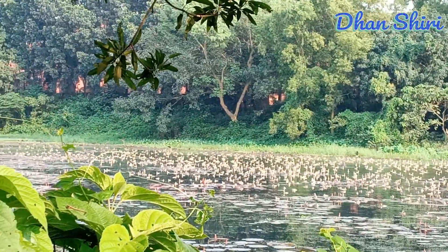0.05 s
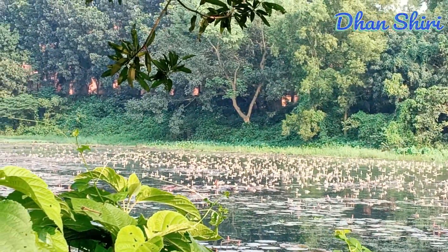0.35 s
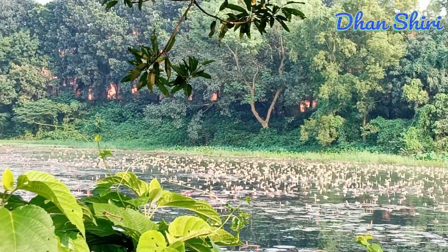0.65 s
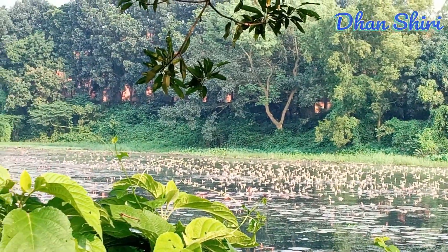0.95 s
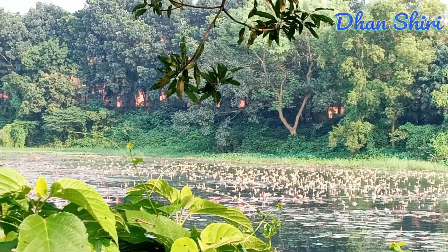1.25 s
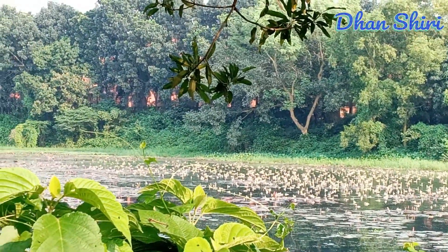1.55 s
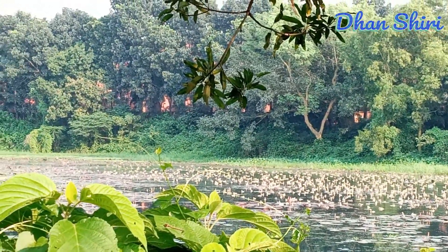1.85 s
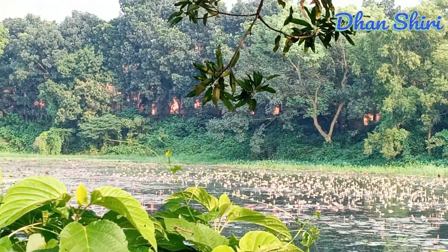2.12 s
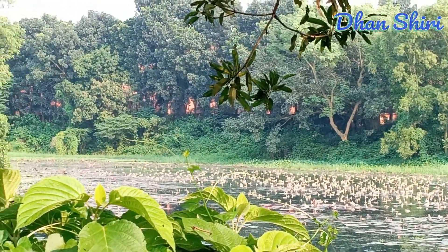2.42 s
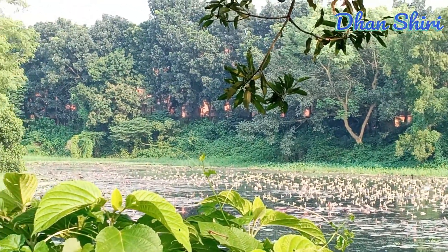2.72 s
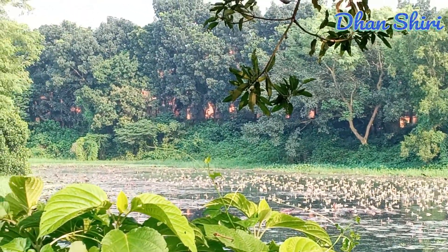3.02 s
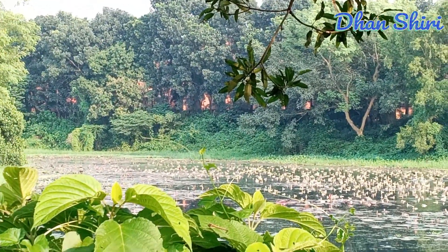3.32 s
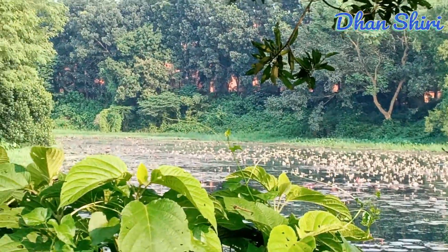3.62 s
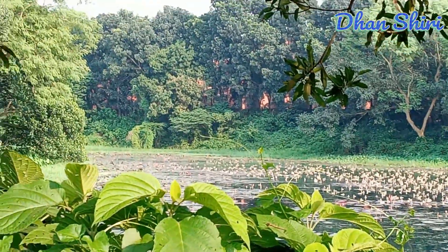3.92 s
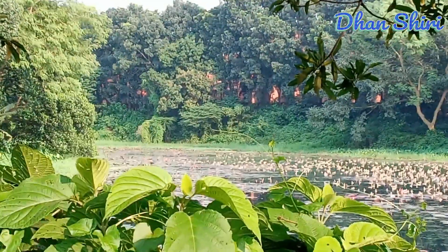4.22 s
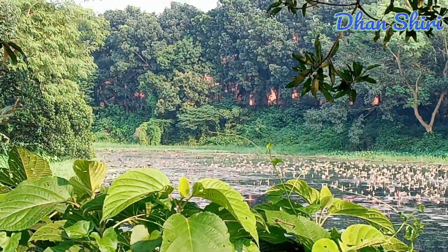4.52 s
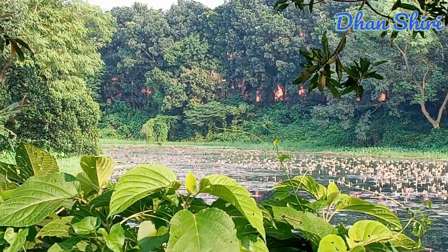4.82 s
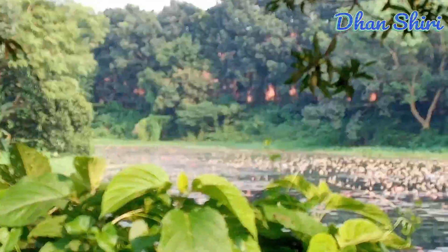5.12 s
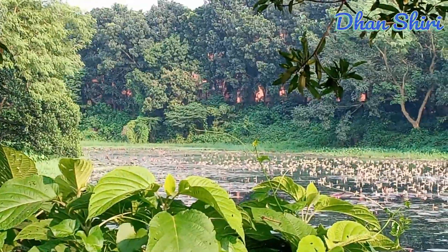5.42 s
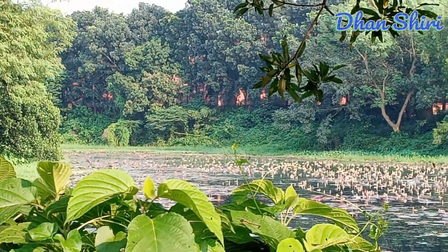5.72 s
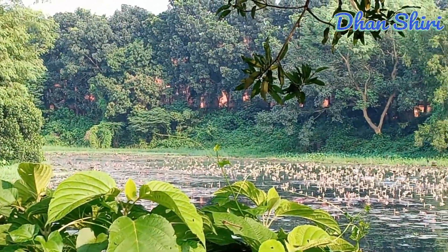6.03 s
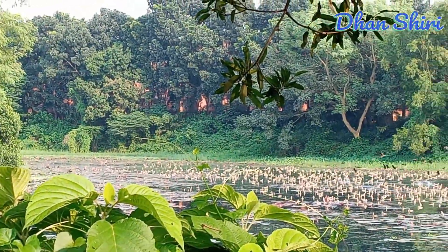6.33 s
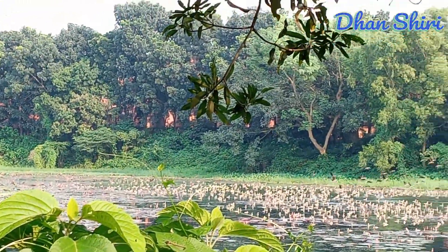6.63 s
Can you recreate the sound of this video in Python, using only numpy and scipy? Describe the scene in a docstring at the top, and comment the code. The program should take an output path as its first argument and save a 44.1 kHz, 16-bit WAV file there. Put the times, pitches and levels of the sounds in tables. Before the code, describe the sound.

Hundreds of ducks call in shrill overlapping whistles outdoors, a faint motor humming far away and a single pop cutting in halfway.

```python
"""Whistling ducks on a lake.

Hundreds of ducks call at once, heard from the leafy bank. Their short arched whistles pile up into a
seething chorus; nearer birds stand out, scattered by reeds and leaves and echoed by the tree line.
A far motor hums, a few other birds call, leaves rustle, and one sharp pop falls in the middle."""
import sys
import numpy as np
from scipy import signal
from scipy.fft import rfft, irfft, next_fast_len
from scipy.io import wavfile
from scipy.ndimage import uniform_filter1d

SR = 44100
rng = np.random.default_rng(int(sys.argv[2]) if len(sys.argv) > 2 else 0)


def transcribe(u):
    """Save the signal u as a 16-bit wav file named by the first command-line argument.

    u: samples, shape (n,) or (channels, n), limited to [-1, 1]; the rate is SR.
    q: integer samples, one column per channel.
    """
    v = np.clip(np.atleast_2d(u).T, -1, 1)
    q = np.round(v * 32767).astype(np.int16)
    wavfile.write(sys.argv[1], SR, q)


N = 302526
TIME = np.arange(N) / SR
FLOCK_LAG_S = 0.0008033  # the flock reaches the right microphone first


def amp(db):
    """Decibels to gain."""
    return 10 ** (np.asarray(db) / 20)


def unit(x):
    """Scales to rms 1."""
    return x / np.sqrt(np.mean(x ** 2) + 1e-20)


def pan(left_db):
    """Stereo gains that put the left side left_db above the right."""
    return amp([[left_db / 2], [-left_db / 2]])


def eq_db(points, hz):
    """Reads an EQ curve on a log-frequency axis."""
    f, db = np.transpose(points)
    return np.interp(np.log(hz + 1), np.log(f + 1), db)


def follow(rows, t=TIME, column=1):
    """Reads one column of a curve at times t."""
    rows = np.asarray(rows)
    return np.interp(t, rows[:, 0], rows[:, column])


def add(mix, s, sound):
    """Mixes a sound in at time s, cut to the scene."""
    at = int(round(s * SR))
    sound = sound[..., max(-at, 0):]
    part = mix[..., max(at, 0):][..., :sound.shape[-1]]
    part += sound[..., :part.shape[-1]]


def shape(x, gain):
    """Filters by a gain that is a function of frequency."""
    size = next_fast_len(x.shape[-1] + 2048)
    return irfft(rfft(x, size) * gain(np.fft.rfftfreq(size, 1 / SR)), size)[..., :x.shape[-1]]


def equalise(x, points):
    """Colours a sound with an EQ curve."""
    return shape(x, lambda f: amp(eq_db(points, f)))


def lowpass(x, hz, order):
    """Rolls off the top by 6 dB an octave for each order."""
    return shape(x, lambda f: 1 / np.hypot(1, (f / hz) ** order))


def above(x, edge_hz):
    """The part of a sound above a steep edge."""
    return x - shape(x, lambda f: 1 / (1 + (f / edge_hz) ** 20))


def delay_left(x, lag_s):
    """Places a sound to the right by delaying its left channel."""
    return shape(x, lambda f: np.exp(-2j * np.pi * f * np.array([[lag_s], [0]])))


def noise_pair(correlation):
    """White noise at two microphones, partly shared."""
    left, other = rng.standard_normal((2, N))
    return np.array([left, correlation * left + np.sqrt(1 - correlation ** 2) * other])


def wander(rate_hz):
    """A smooth random modulator of rms 1."""
    return unit(shape(rng.standard_normal(N), lambda f: np.exp(-(f / rate_hz) ** 2)))


def shimmer(x, depth_db, steps):
    """Fades narrow bands in and out independently; a fade lasts so many steps of 3 ms."""
    bands = signal.stft(x, nperseg=256)[2]
    fades = uniform_filter1d(rng.standard_normal(bands.shape[1:]), size=4, axis=0)
    fades = unit(uniform_filter1d(fades, size=steps, axis=1))
    return signal.istft(bands * amp(depth_db * fades))[1][:, :N]


def echoes(x, t60_s, predelay_s, taps_per_s=2000):
    """Scattered reflections, different at each microphone; foliage dulls them."""
    t = TIME[:SR]
    taps = rng.standard_normal((2, SR)) * (rng.random((2, SR)) < taps_per_s / SR)
    taps *= (t > predelay_s) * amp(-60 * t / t60_s)
    taps /= np.linalg.norm(taps, axis=1, keepdims=True)
    return lowpass(signal.fftconvolve(x, taps, axes=1)[:, :N], hz=8500, order=2)


def tree_line(x):
    """The long echo of the far bank and its trees."""
    return echoes(x, t60_s=0.66, predelay_s=0.017)


def through_leaves(notes, broken_db=-3, smeared_db=-9):
    """Foliage breaks up and smears the overtones of a whistle, and takes the highest away."""
    high = above(notes, edge_hz=6300)
    broken = amp(broken_db) * shimmer(high, depth_db=3, steps=3)
    smeared = amp(smeared_db) * echoes(high, t60_s=0.13, predelay_s=.001)
    return lowpass(notes - high + broken + smeared, hz=9200, order=6)


def whistle(length_s, start_hz, mid_hz, end_hz, overtone_db, lag_s, quiver, third_db=-18):
    """One note at both microphones: an arch of pitch with a quiver and two weaker overtones."""
    u = np.linspace(0, 1, max(int(length_s * SR), 64))
    arch_hz = mid_hz - (start_hz + end_hz) / 2
    hz = start_hz + (end_hz - start_hz) * u + 4 * arch_hz * u * (1 - u)
    hz *= 1 + quiver[:len(u)]
    phase = 2 * np.pi * (np.cumsum(hz) / SR - np.array([[lag_s], [0]]) * hz)
    third = amp(third_db) * np.sin(3 * phase) * (hz < SR / 6)  # muted where it would alias
    voice = np.sin(phase) + amp(overtone_db) * (np.sin(2 * phase) + third)
    return voice * np.sqrt(2) * np.abs(np.sin(np.pi * u)) ** 0.23


def calls(rows, quiver_depth, quiver_hz, overtone, lag_s, lag_spread_s):
    """Plays a table of notes, each from its own direction; overtone gives dB for a pitch."""
    out, quiver = np.zeros((2, N)), quiver_depth * wander(quiver_hz)
    for (s, length, hz, sweep, arch, db), side in zip(rows, rng.standard_normal(len(rows))):
        start, end = hz * 2 ** (-sweep / 2 - arch), hz * 2 ** (sweep / 2 - arch)
        lag = lag_s + lag_spread_s * side
        add(out, s, amp(db) * whistle(length, start, hz, end, overtone(hz), lag, quiver[int(s * SR):]))
    return out


# Tone of the outdoor rumble: (frequency [Hz], level [dB])
RUMBLE_EQ = [(12, -63), (20, -32.5), (80, -3), (112, -5.5), (146, -6), (198, -13), (237, -10.5), (263, -15),
             (473, -20.5), (556, -25), (882, -28), (1170, -36.5), (1400, -65), (1820, -58), (3080, -120)]
# Tone of the breeze in the trees: (frequency [Hz], level [dB])
BREEZE_EQ = [(150, -50), (310, 6), (420, -2.5), (560, -15.5), (700, -1.5), (860, 2), (1050, -7.5),
             (1300, -3.5), (2200, -3.5), (5000, -55), (11000, -14), (15000, -29)]
# Fader ride of the breeze: (time [s], level [dB])
BREEZE_RIDE = [(0, -58), (.3, -91), (1, -58.5), (1.8, -88), (2.8, -60), (4.1, -67.5), (4.8, -57),
               (5.2, -53.5), (5.95, -52.5), (6.3, -53.5), (6.86, -61)]


def open_air(rumble_db=-49.5, swell_db=2, breeze_db=0.5, gust_db=2.6):
    """The bed: a lumpy outdoor rumble and a faint breeze in the trees."""
    rumble = unit(equalise(noise_pair(0.78), RUMBLE_EQ))
    breeze = unit(equalise(noise_pair(0.33), BREEZE_EQ))
    rumble *= amp(rumble_db + swell_db * wander(5.9))
    breeze *= amp(follow(BREEZE_RIDE) + breeze_db + gust_db * wander(14.3))
    return rumble + breeze


# Fader rides of the motor's two tones: (time [s], firing level [dB], octave level [dB])
MOTOR_RIDE = [(0, -46.5, -63.5), (.6, -46, -56), (1.2, -43.5, -55.5), (2.8, -47, -52.5), (3.65, -59, -53),
              (4.45, -54, -61), (5, -59, -80), (5.3, -65, -46.5), (5.95, -63, -49.5), (6.4, -44, -50.5),
              (6.86, -48.5, -48)]


def far_motor(firing_hz=115.1, firing_db=-1, octave_db=-3, waver=0.00866, flutter_db=2.5, fade_db=4):
    """A firing tone and its octave waver on the way over the water; the octave fades in and out."""
    phase = 2 * np.pi * np.cumsum(firing_hz * (1 + waver * wander(8))) / SR
    firing = amp(follow(MOTOR_RIDE) + firing_db + flutter_db * wander(23))
    octave = amp(follow(MOTOR_RIDE, column=2) + octave_db + flutter_db * wander(28))
    octave *= amp(fade_db * wander(10.5))
    return np.sqrt(2) * (firing * np.sin(phase) + octave * np.sin(2 * phase))


# Leaf brushes and soft bumps: (time [s], length [s], centre [Hz], width [Hz], level [dB])
RUSTLE_CUES = [(0, 0.08, 404, 200, -52), (0, 0.22, 182, 60, -49), (0.027, 0.027, 10600, 2500, -50),
               (3.42, 0.061, 15100, 3000, -60), (3.424, 0.19, 375, 296, -51),
               (3.572, 0.1, 11000, 4000, -51.5), (3.99, 0.026, 1600, 696, -48),
               (4.151, 0.075, 260, 232, -44.5), (4.174, 0.054, 1970, 595, -40),
               (4.74, 0.051, 10800, 6560, -41.5), (4.865, 0.011, 930, 500, -44),
               (5.877, 0.18, 252, 126, -47), (6.582, 0.27, 252, 150, -53)]


def rustles():
    """Short puffs of noise from leaves and soft bumps; each rises quickly and fades."""
    out = np.zeros((2, N))
    for s, length, hz, width, db in RUSTLE_CUES:
        noise = rng.standard_normal((2, SR))[:, :int(2 * length * SR)]  # room for the tail
        puff = unit(shape(noise, lambda f: np.exp(-2 * ((f - hz) / width) ** 2)))
        age = TIME[:puff.shape[1]] / (length / 2)  # 1 at the peak
        add(out, s, amp(db) * puff * (age * np.exp(1 - age)) ** 2)
    return out * pan(left_db=3)


# Mellow gliding calls from beyond the trees:
# (time [s], length [s], pitch [Hz], sweep [octaves], arch [octaves], level [dB])
FAR_BIRD_CUES = [(1.14, 0.22, 1484, 0.029, 0.0055, -53.5), (1.49, 0.13, 1463, 0.048, -0.013, -53.5),
                 (1.59, .16, 1690, 0.32, -.02, -52.5), (1.86, 0.09, 1252, -0.098, -0.049, -53),
                 (1.93, 0.05, 442, 0.14, .05, -51), (2.205, .15, 508, 0.063, .05, -46.5),
                 (2.44, 0.032, 428, -0.074, .01, -49), (2.8, .15, 1400, 0.23, -0.033, -50.5),
                 (3.11, 0.21, 1613, 0.017, 0.02, -47.5), (3.19, 0.11, 2150, -0.016, -0.001, -41),
                 (3.31, .11, 1560, -.25, 0.016, -50.5)]


def far_birds(direct_db=-7, scatter_db=-5, echo_db=-9):
    """Nearly pure notes that flutter as they pass through the trees."""
    notes = calls(FAR_BIRD_CUES, quiver_depth=.015, quiver_hz=150, overtone=lambda hz: -40,
                  lag_s=.00067, lag_spread_s=.00004)
    notes *= 1 + .3 * wander(50)
    scattered = echoes(notes, t60_s=0.08, predelay_s=0.00056)
    return amp(direct_db) * notes + amp(scatter_db) * scattered + amp(echo_db) * tree_line(notes)


# High chirps: (time [s], length [s], pitch [Hz], sweep [octaves], arch [octaves], level [dB])
CHIRP_CUES = [(.125, 0.035, 10700, -0.31, 0, -45), (.215, 0.051, 9100, 0.51, .078, -48),
              (.25, 0.068, 10600, 0.02, 0.03, -49), (.855, 0.053, 10500, -0.099, .01, -61),
              (1.015, .06, 11400, 0, 0.026, -57), (1.255, 0.033, 11300, -0.045, .02, -61),
              (3.82, 0.039, 8500, -0.13, .02, -43), (4.04, .024, 8480, -.05, 0.022, -41)]


def small_birds(direct_db=-4, echo_db=-13):
    """Thin, fluttering chirps from the bank."""
    notes = calls(CHIRP_CUES, quiver_depth=.005, quiver_hz=120, overtone=lambda hz: -80,
                  lag_s=FLOCK_LAG_S, lag_spread_s=.00008)
    notes = shimmer(notes, depth_db=3.5, steps=4)
    return amp(direct_db) * notes + amp(echo_db) * tree_line(notes)


# A sharp pop and a faint tick right behind it: (time [s], push level [dB], crack level [dB])
POP_CUES = [(3.4235, -17.5, -31), (3.4464, -37, -40)]


def pop(ring_hz=310, push_s=.0016, crack_s=.0026, hiss_db=-19, hiss_s=0.062):
    """A push of pressure that swings back once; its bright crack and faint hiss sit to the left."""
    t, out = TIME[:SR // 10], np.zeros((2, N))
    push = np.exp(-t / push_s) * np.cos(2 * np.pi * ring_hz * t)
    crack_envelope = np.exp(-t / crack_s) + amp(hiss_db) * np.exp(-t / hiss_s)
    for s, push_db, crack_db in POP_CUES:
        crack = crack_envelope * pan(left_db=7) * rng.standard_normal((2, len(t)))
        add(out, s, amp(push_db) * push + amp(crack_db) * crack)
    return out


def dip(centre_s=3.43, half_width_s=.02, depth_db=-9.5):
    """A gain that drops briefly around the pop."""
    return amp(depth_db * np.exp(-((TIME - centre_s) / half_width_s) ** 8))


# Tone of the farthest ducks: (frequency [Hz], level [dB])
WASH_EQ = [(650, -85), (1100, -29), (2170, -7.5), (2430, -1), (3070, -3.5), (3470, -10.5), (4190, -12.5),
           (4900, -2), (5900, -2), (7490, -18.5), (8460, -13), (9670, -31.5), (10900, -29), (13400, -54),
           (14900, -41), (15800, -44)]


def far_flock():
    """The farthest ducks merge into a shimmering wash."""
    wash = delay_left(equalise(noise_pair(0.011), WASH_EQ), FLOCK_LAG_S)
    return unit(shimmer(wash, depth_db=2.3, steps=10))


# How whistles carry over water and through leaves: (frequency [Hz], gain [dB])
CARRY_EQ = [(1500, -18), (2100, -4), (2450, 3), (2900, 1), (3100, 0), (3400, 2.5), (3750, 1.5), (4700, 3.5),
            (5400, 2), (7000, -1), (8500, -18.5), (9800, -15.5), (13000, -24)]


def mid_flock(count=1150, pitch_hz=3950, pitch_spread=.18, length_s=.033, beat_s=.12,
              rise=0.0352, sweep_spread=0.0812, arch=0.0598, near_db=2, edge_db=-0.67, overtone_db=-12):
    """Ducks at middle distance each give a two-note whistle; nearer ones are louder."""
    out, quiver = np.zeros((2, N)), 0.011 * wander(262)
    ducks = zip(rng.random((count, 2)), rng.standard_normal((count, 7)).clip(-2.4, 2.4))
    for turn, ((jitter, spot), (pitch, stretch, near, side, slope, bend, pause)) in enumerate(ducks):
        s = (turn + jitter) / count * (N / SR + beat_s) - beat_s  # calls keep coming at an even pace
        capped_pitch = min(pitch, 1.6 * np.tanh(pitch / 1.6))  # voices crowd under a highest pitch
        hz = pitch_hz * np.exp(pitch_spread * capped_pitch)
        length = length_s * np.exp(.35 * stretch)
        lag = FLOCK_LAG_S + .00012 * side
        gain = amp(near_db * near + edge_db * pitch ** 2 / 2)  # the highest and lowest are softer
        glide = np.exp(-(pitch / 2.1) ** 2)  # middle voices swoop the most
        sag = glide * arch * (1 + 0.927 * bend)
        first = (0, rise + sweep_spread * slope)  # tends to sweep up
        second = (beat_s * np.exp(.25 * pause), sweep_spread * slope / 2)  # tends to level off
        for delay, sweep in (first, second):
            start, end = hz * np.exp(-glide * sweep - sag), hz * np.exp(glide * sweep - sag)
            note = whistle(length, start, hz, end, overtone_db, lag, quiver[int(spot * N / 2):])
            add(out, s + delay, gain * note)
    return unit(equalise(out, CARRY_EQ))


# The flock swells as the birds answer one another: (time [s], level [dB], shrillness [dB])
CHORUS_RIDE = [(0, -29.5, 0), (.3, -30, 0), (.88, -33.5, -1.2), (1, -30, -1.5), (1.55, -33, 3),
               (1.88, -33.5, -2), (2.05, -27.5, -1.5), (2.33, -33, -0.5), (2.45, -31.5, -2.5),
               (2.58, -28, -0.5), (2.9, -31.5, -1), (3.24, -28, 2.5), (3.42, -30.5, 0), (4.05, -31, -0.5),
               (4.78, -28, 2.5), (5.35, -29, 1.5), (5.48, -32.5, 2.5), (5.68, -31, -1), (5.79, -25.5, 4),
               (6.05, -29.5, 3.5), (6.4, -27.5, 1.5), (6.86, -26.5, 6)]
# Fader ride of the treble, where the flock's overtones and their echoes lie: (time [s], level [dB])
TREBLE_RIDE = [(0.0, -48), (0.84, -52), (1.16, -50), (1.39, -52), (1.58, -53), (2.62, -46), (3.04, -48),
               (3.93, -47.5), (4.32, -49.5), (4.97, -45), (5.48, -51), (6.15, -49), (6.86, -47.5)]


def chorus(mid_db=-1.5, echo_db=-9, far_db=-6.5, surge_db=0.58, far_swell_share=0.52,
           tilt_hz=4500, treble_hz=6700, treble_db=2):
    """The flock swells and grows shriller as birds join in; far ones are steadier, the treble flickers."""
    mid = mid_flock()
    mid = amp(mid_db) * mid + amp(echo_db) * tree_line(mid)
    far = amp(far_db) * far_flock()
    level_db, shrill_db = follow(CHORUS_RIDE), follow(CHORUS_RIDE, column=2)
    steady_db = level_db.mean()
    swell_db = level_db - steady_db + surge_db * wander(6.4)
    body = amp(swell_db) * mid + amp(far_swell_share * swell_db) * far
    body -= above(body, treble_hz)
    low = shape(body, lambda f: 1 / (1 + (f / tilt_hz) ** 10))
    tilted = low * amp(-shrill_db / 2) + (body - low) * amp(shrill_db)
    treble = unit(shimmer(above(mid + far, treble_hz), depth_db=1.6, steps=12))
    return amp(steady_db) * tilted + amp(follow(TREBLE_RIDE) + treble_db) * treble


def duck_overtone(hz, low_voice_hz=3170, reedy_db=-4, db_per_octave=-35.5):
    """A duck's overtone in dB: low whistles are reedy, high ones nearly pure."""
    return reedy_db + db_per_octave * np.log2(np.maximum(hz / low_voice_hz, 1))


# Near whistles: (time [s], length [s], pitch [Hz], sweep [octaves], arch [octaves], level [dB])
WHISTLE_CUES = [(.057, 0.031, 5560, 0.53, .02, -32.5), (.06, 0.043, 4640, 0.24, 0.19, -29.5),
                (.072, .045, 5100, -0.097, 0.074, -33.5), (.115, 0.051, 4190, 0.21, -0.1, -25),
                (.205, 0.019, 4100, -0.24, 0.032, -29), (.24, 0.07, 5300, 0.028, 0.073, -36.5),
                (.295, 0.021, 4320, .08, -0.026, -39), (.498, 0.026, 4190, 0.4, 0.038, -31),
                (.655, 0.057, 4800, 0.23, 0.14, -31), (.745, 0.047, 4300, 0.012, 0, -36),
                (.948, 0.027, 3540, 0.21, 0.017, -25), (1.02, 0.065, 3400, 0.02, 0.096, -28),
                (1.025, 0.14, 6720, 0.052, 0.11, -36), (1.078, 0.032, 4400, 0.94, 0.019, -27.5),
                (1.143, 0.01, 3300, -.15, 0.035, -30), (1.595, 0.068, 4130, 0.15, .02, -31.5),
                (1.645, 0.067, 5600, 0, 0.067, -33), (1.73, .04, 5600, .04, 0.06, -34),
                (1.96, .04, 5650, -0.058, .04, -33), (2.05, 0.03, 4400, 0.17, -0.017, -27),
                (2.06, 0.012, 3500, .08, -0.065, -27), (2.132, 0.028, 3500, 0.082, 0.048, -30),
                (2.514, 0.026, 4350, 0.17, -0.027, -24.5), (2.572, 0.033, 3500, 0.16, 0, -32),
                (2.61, 0.046, 7650, 0, .01, -42), (2.68, 0.042, 4110, 0.038, 0.054, -29.5),
                (3.05, 0.045, 4830, .15, .2, -31), (3.125, 0.031, 5820, .15, .08, -34),
                (3.203, 0.046, 3520, 0.27, -.02, -29), (3.225, 0.12, 4640, 0.002, 0.018, -31.5),
                (3.24, 0.023, 4200, 0.25, 0.014, -27), (3.215, 0.028, 5510, .12, 0.039, -27.5),
                (3.375, 0.024, 4300, .15, .03, -47), (3.485, 0.016, 4710, .05, .06, -32),
                (3.585, 0.037, 4140, .3, 0.26, -32.5), (3.687, 0.033, 4750, 0.45, 0.013, -31),
                (3.72, .022, 4430, 0.045, 0.04, -32), (3.75, 0.019, 5130, -0.041, 0.012, -33),
                (3.81, 0.023, 5100, 0.16, 0.05, -30.5), (3.855, 0.015, 5300, -.25, 0.029, -32),
                (4.025, 0.038, 2945, -0.31, -.06, -31), (4.06, 0.047, 3370, 0.15, 0.013, -26.5),
                (4.385, 0.033, 4630, -.08, -0.011, -32), (4.412, 0.025, 5100, -0.15, .02, -33),
                (4.465, 0.046, 3420, 0.12, -.02, -34.5), (4.515, .045, 3740, 0.42, -.02, -35),
                (4.575, 0.054, 3710, .45, .03, -32.5), (4.645, .03, 3580, 0.27, -0.063, -27.5),
                (4.728, 0.025, 3850, 0.42, 0.022, -30), (4.775, 0.042, 4070, .12, .02, -30),
                (4.825, 0.038, 3870, 0.43, -0.021, -31), (4.86, .035, 4900, 0.026, .03, -30),
                (5.005, 0.049, 4950, 0.039, .12, -32), (5.085, .02, 5080, 0, 0.0057, -32),
                (5.15, 0.061, 4650, -0.22, .04, -33), (5.255, 0.018, 4300, -.2, -0.012, -32),
                (5.533, .018, 5020, 0, 0.035, -29), (5.565, 0.014, 3950, -.05, 0.02, -27.5),
                (5.567, 0.017, 3470, 0, .02, -31.5), (5.585, .1, 6750, -0.079, .04, -38),
                (5.645, 0.023, 4000, -0.026, 0.0082, -26), (5.728, 0.039, 5980, -.02, 0, -36),
                (5.765, 0.025, 3420, -0.17, 0.016, -28.5), (5.92, 0.087, 4640, .06, 0.09, -28),
                (6.055, 0.043, 4550, 0.15, -0.072, -27.5), (6.092, .048, 5800, 0, 0.066, -36),
                (6.213, 0.032, 5050, .03, .05, -32), (6.26, 0.057, 4700, 0.12, .03, -30),
                (6.3, .03, 3800, .45, 0, -30.5), (6.35, 0.084, 5950, 0, 0.031, -32),
                (6.315, 0.073, 5030, 0.082, 0.088, -27.5), (6.33, 0.034, 4260, 0.24, .03, -26),
                (6.545, 0.038, 4870, .15, .03, -32), (6.603, 0.036, 4100, 0.64, -0.019, -32),
                (6.638, .045, 5980, 0.13, 0.05, -31), (6.68, .045, 4300, 0.71, .06, -29),
                (6.725, 0.051, 5780, 0.065, 0.029, -25), (6.79, 0.064, 4400, -0.038, 0.068, -30)]
# How much of a whistle the reeds and leaves scatter: (time [s], wet share [0-1])
SCATTER_MIX = [(0, 0), (2.6, 0.23), (3.6, 0), (5.65, 0.7), (5.9, 0.46), (6.86, 0.3)]


def near_ducks(echo_db=-11, reeds_hz=5600):
    """Single whistles arrive partly straight, partly scattered, then return from the trees."""
    notes = calls(WHISTLE_CUES, quiver_depth=0.013, quiver_hz=257, overtone=duck_overtone,
                  lag_s=FLOCK_LAG_S, lag_spread_s=.00004)
    notes = through_leaves(notes)
    wet = follow(SCATTER_MIX)
    scattered = echoes(notes * np.sqrt(wet), t60_s=0.048, predelay_s=0.00055)
    scattered = lowpass(scattered, reeds_hz, order=6)  # bouncing in the reeds dulls it
    return notes * np.sqrt(1 - wet) + scattered + amp(echo_db) * tree_line(notes)


# Foreground ducks, one list of points for each slurred call: (time [s], pitch [Hz], level [dB])
SLURRED_CALLS = [
    [(.133, 7980, -47), (.153, 5890, -29), (.185, 5520, -24.5), (.21, 5320, -31)],
    [(1.22, 3220, -36), (1.245, 4700, -37), (1.265, 5750, -27.5), (1.281, 5530, -31)],
    [(2.185, 3470, -28), (2.213, 3680, -28), (2.23, 4270, -31), (2.262, 5230, -35)],
    [(2.351, 3650, -34), (2.368, 4240, -25), (2.393, 4750, -29), (2.418, 4470, -23), (2.445, 4330, -26)],
    [(2.472, 3235, -28), (2.481, 3680, -23), (2.491, 4370, -29), (2.5, 5010, -25), (2.507, 5200, -20.5),
     (2.513, 5790, -25), (2.537, 5820, -30), (2.544, 4670, -34), (2.55, 3670, -29), (2.57, 3250, -23)],
    [(5.29, 3260, -39), (5.315, 3650, -35), (5.33, 3950, -24.5), (5.36, 4320, -33), (5.395, 4370, -25.5),
     (5.432, 4040, -26)],
    [(5.688, 3210, -33), (5.703, 3780, -27), (5.719, 4390, -20)],
]


def closest_ducks(overtone_db=-2, fade_s=.004, reeds_db=-14, echo_db=-9):
    """Each call is one unbroken, quivering glide of pitch, echoed by the reeds and the tree line."""
    out, quiver = np.zeros((2, N)), 0.0089 * wander(260)
    for points in SLURRED_CALLS:
        t = np.arange(points[0][0], points[-1][0], 1 / SR)
        hz = uniform_filter1d(follow(points, t), size=200, mode="nearest")  # rounds the corners
        hz *= 1 + quiver[int(t[0] * SR):][:len(t)]
        phase = 2 * np.pi * (np.cumsum(hz) / SR - np.array([[FLOCK_LAG_S], [0]]) * hz)
        gate = np.minimum(np.minimum(t - t[0], t[-1] - t) / fade_s, 1)
        voice = np.sin(phase) + amp(overtone_db + duck_overtone(hz)) * np.sin(2 * phase)
        add(out, t[0], np.sqrt(2) * gate * amp(follow(points, t, column=2)) * voice)
    direct = through_leaves(out) * pan(left_db=1.5)
    reeds = echoes(direct, t60_s=0.031, predelay_s=.001)
    return direct + amp(reeds_db) * reeds + amp(echo_db) * tree_line(direct)


def scene():
    """The mix: ducks, other birds, rustles and the pop over a bed of open air and motor."""
    bed = delay_left(open_air() + far_motor(), lag_s=0.00087)
    ducks = (chorus() + near_ducks() + closest_ducks()) * dip()
    return bed + ducks + small_birds() + far_birds() + rustles() + pop()


# Colour of the microphone pair: (frequency [Hz], left minus right [dB])
MIC_BALANCE_EQ = [(60, 2.5), (600, 4), (1080, -1.5), (1450, 1.5), (2700, 0.6), (4000, 3.5), (5750, 1),
                  (6700, 4.5), (8300, 11.5), (9900, 1), (11000, -5.5), (12500, -2), (15000, 8)]


def record(dry, high_cut_hz=15800):
    """Each microphone adds its own colour; a steep high cut follows."""
    coloured = shape(dry, lambda f: amp(np.array([[.5], [-.5]]) * eq_db(MIC_BALANCE_EQ, f)))
    high_cut = signal.firwin(511, high_cut_hz, window=("kaiser", 9), fs=SR)
    return signal.oaconvolve(coloured, high_cut[None], "same")


dry = scene()
out = record(dry)
transcribe(out)
```